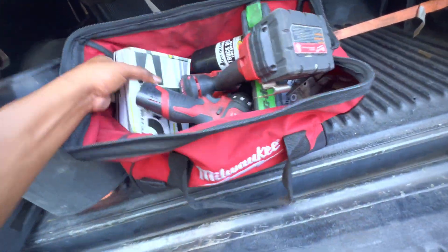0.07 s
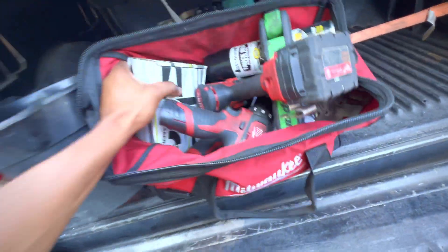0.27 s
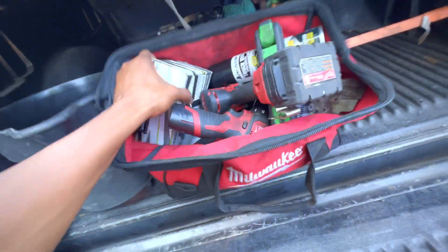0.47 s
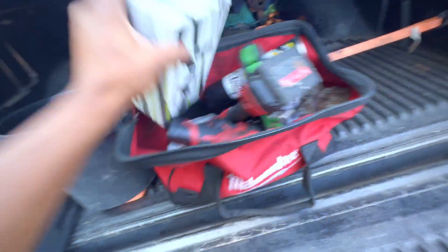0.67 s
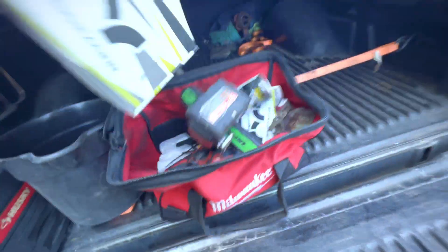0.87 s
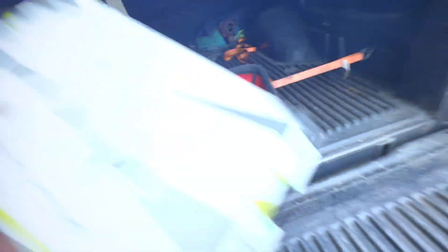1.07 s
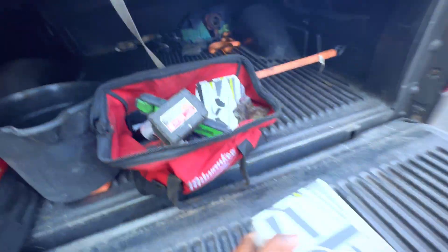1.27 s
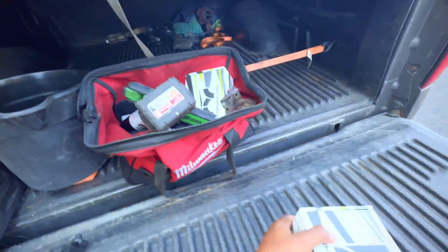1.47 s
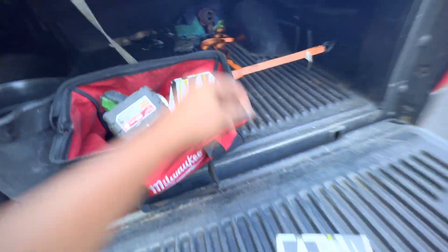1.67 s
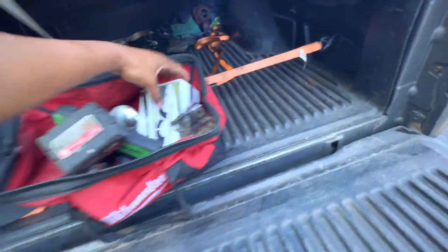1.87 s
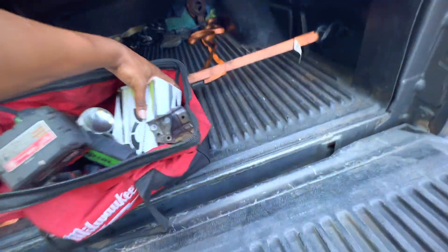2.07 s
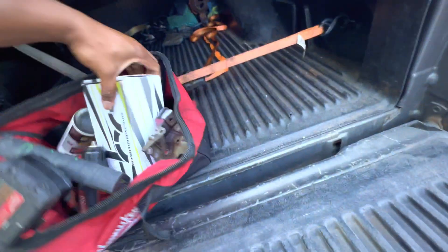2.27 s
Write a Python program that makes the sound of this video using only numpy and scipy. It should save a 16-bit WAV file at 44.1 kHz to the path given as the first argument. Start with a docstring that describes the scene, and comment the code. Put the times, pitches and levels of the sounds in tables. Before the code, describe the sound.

Rummaging in a fabric tool bag, slightly left: from 0 to 1.25 s cloth and cardboard rustle while plastic-cased tools knock, steel bits clink and heavier thumps come around 0.7 s. The carton squeaks briefly at 1.0 s. At 1.37 s it drops loudly on the hollow tailgate, rocks and lands again at 1.55 s. After a lull, soft rustling resumes from 1.9 s, with a cardboard scuff at 2.3 s. Low rumble beneath.

```python
"""The bed of a pickup, heard by a two-port microphone: a hand digs a carton out of a fabric tool bag, a little
to the left. Over a low rumble, grainy noise makes the cloth and cardboard rustle; damped modes and noise bursts
make plastic-cased tools knock and steel parts clink. The carton squeaks free, then drops on the hollow tailgate
ahead with booming noise and ringing modes, rocks and lands again. After a lull the hand digs in the bag once
more, and fingers scuff stiff cardboard: friction noise through panel resonances."""
import sys
import numpy as np
from scipy import signal
from scipy.fft import rfft, irfft
from scipy.io import wavfile

SR = 44100
rng = np.random.default_rng(int(sys.argv[2]) if len(sys.argv) > 2 else 0)


def unload_audio(sound):
    """Save the sound as a 16-bit wav file, at the path given as the first command line argument."""
    columns = np.transpose(np.atleast_2d(sound))
    # keep every value between -1 and 1, then stretch to whole-number steps
    steps = np.round(np.clip(columns, -1, 1) * 32767)
    wavfile.write(sys.argv[1], SR, steps.astype(np.int16))


N = 101826
TIME = np.arange(N) / SR
HIT = SR // 2   # samples in one struck sound
AGE = np.arange(HIT) / SR   # time since the strike [s]
ATTACK_S = 0.0004
TAIL_DB, TAIL_T60_S = -14, 0.17   # reflections that follow a contact


def from_db(db):
    """Decibels to gain."""
    return 10 ** (np.asarray(db) / 20)


def at_hz(points, hz):
    """Read a table on a log-frequency axis."""
    f, v = np.transpose(points)
    return np.interp(np.log(hz + 1e-9), np.log(f), v)


def in_time(rows):
    """The columns of a curve at every sample."""
    s, *columns = np.transpose(rows)
    return [np.interp(TIME, s, c) for c in columns]


def decay(t60):
    """A fall of 60 dB in t60 seconds."""
    return np.exp(-np.log(1000) * AGE / t60)


def attack(attack_s):
    """A strike builds up exponentially, as the contact takes a moment."""
    return 1 - np.exp(-AGE / attack_s)


def swell(s, width_s):
    """A smooth rise and fall around time s."""
    return np.exp(-((TIME - s) / width_s) ** 2 / 2)


def wander(size, over_s):
    """Smooth random motion of spread 1: noise low-passed at 1 / over_s."""
    lowpass = signal.butter(2, 1 / over_s, fs=SR, output="sos")
    x = signal.sosfilt(lowpass, rng.standard_normal(size))
    return x / x.std()


def add(out, s, sound):
    """Mix a struck sound in at time s."""
    i = int(s * SR)
    out[:, i:i + HIT] += sound[..., :N - i]


# likeness of the two microphone ports: (frequency [Hz], left-right correlation [0-1])
PORT_LIKENESS = [(150, 0.93), (450, 0.86), (900, 0.14), (1800, 0.32), (5000, 0.011)]


def noise(spectrum, size, tilt_db=0):
    """Coloured stereo noise of rms 1, alike on both sides in the bass; tilt in dB per octave."""
    hz = np.arange(size // 2 + 1) * SR / size
    mid, side = rfft(rng.standard_normal((2, size)))
    alike = np.clip(at_hz(PORT_LIKENESS, hz), 0, 1)
    colour = from_db(at_hz(spectrum, hz) + tilt_db * np.log2(hz + 1))
    shared = np.sqrt(1 + alike) * mid
    opposed = np.sqrt(1 - alike) * side * [[1], [-1]]
    x = irfft(colour * (shared + opposed), size)
    return x / x.std()


def burst(spectrum, t60, tilt_db=0):
    """Dense, quickly damped modes of one contact and their reflections, as noise scaled to its envelope's spread."""
    fall = np.hypot(decay(t60), from_db(TAIL_DB) * decay(TAIL_T60_S))
    envelope = fall * attack(ATTACK_S)
    x = noise(spectrum, HIT, tilt_db) * envelope
    return x * envelope.std() / x.std()


def ring(hz, t60, attack_s=ATTACK_S):
    """One struck mode: a decaying sine, rms 1 before its attack and decay."""
    return np.sqrt(2) * np.sin(2 * np.pi * hz * AGE) * decay(t60) * attack(attack_s)


def metal(modes):
    """Steel rings unevenly while it chatters against its neighbours, a little differently on each side."""
    sides = np.zeros((2, HIT))
    for side in range(2):
        for hz, db, t60 in modes:
            chatter_db = 2.6 * wander(HIT, over_s=0.008)
            sides[side] += from_db(db + chatter_db) * ring(hz * rng.normal(1, 0.0015), t60)
    return sides


def from_left(x, lead_s):
    """A source nearer the left port reaches the right port a little later."""
    return np.array([x[0], np.interp(TIME - lead_s, TIME, x[1])])


# low rumble around the truck bed: (time [s], level [dB])
RUMBLE_LEVEL = [(0, -39), (.6, -42), (1.0, -41.5), (1.3, -49), (1.5, -36), (1.7, -36.5), (1.83, -50),
                (1.95, -43.5), (2.31, -51)]
# its colour: (frequency [Hz], relative density [dB per Hz])
RUMBLE_COLOUR = [(20, -54), (35, -3), (55, -6.5), (80, -3.5), (120, -3.5), (200, -13), (400, -29),
                 (1500, -71)]


def rumble():
    """Low noise that slowly rises and falls."""
    level_db, = in_time(RUMBLE_LEVEL)
    return from_db(level_db) * noise(RUMBLE_COLOUR, N)


GRAINS_PER_S, GRAIN_S = 1200, 0.005   # rate of slips and decay time of each
GRAIN_SPREAD_DB, GRAIN_SHARE = 2.5, 0.91   # unevenness of the slips, their share of the power


def grain():
    """Fibres catch and slip at random: a spiky gain of rms 1."""
    strength_db = GRAIN_SPREAD_DB * np.minimum(rng.exponential(1, N), 4)
    slips = (rng.random(N) < GRAINS_PER_S / SR) * from_db(strength_db) ** 2
    power = signal.lfilter([1], [1, -np.exp(-1 / (GRAIN_S * SR))], slips + 1e-18)
    return np.sqrt(1 - GRAIN_SHARE + GRAIN_SHARE * power / power.mean())


# cloth and carton rubbing in the bag: (time [s], scrape level [dB], hiss level [dB])
RUBBING = [(0, -37, -39), (.11, -39, -44), (.2, -32.5, -43), (.255, -41, -49.5), (.38, -34.5, -41.5),
           (.44, -32, -34.5), (.52, -26.5, -34), (.58, -30.5, -42), (.665, -36, -44.5), (.72, -32.5, -41),
           (.83, -40.5, -54.5), (.96, -37, -48.5), (1.16, -36, -54.5), (1.23, -55.5, -47), (1.35, -44, -50),
           (1.44, -27, -43.5), (1.53, -33.5, -45), (1.65, -51, -60), (1.8, -49.5, -62), (1.872, -55, -59),
           (1.885, -79, -45.5), (1.92, -65, -42), (2.05, -46, -50.5), (2.16, -38.5, -43),
           (2.24, -39, -42.5), (2.31, -34.5, -45)]
# colour of cardboard along the tools: (frequency [Hz], relative density [dB per Hz])
SCRAPE_COLOUR = [(80, -6), (170, -1), (400, -4), (800, -13.5), (1400, -12), (2400, -21), (4000, -34.5),
                 (10000, -60)]
# colour of stiff cloth: (frequency [Hz], relative density [dB per Hz])
HISS_COLOUR = [(800, 3.5), (2200, 4.5), (4500, 3), (6500, 4), (9000, 2), (11500, -11.5), (16000, -11.5)]


def rustle():
    """Cardboard scrapes along the tools and stiff cloth hisses, both in the same grains."""
    scrape_db, hiss_db = in_time(RUBBING)
    scrape = from_db(scrape_db) * noise(SCRAPE_COLOUR, N)
    hiss = from_db(hiss_db) * noise(HISS_COLOUR, N)
    return grain() * (scrape + hiss)


RATTLES_PER_S, RATTLE_T60_S = 130, 0.05
RATTLE_LOW_HZ, RATTLE_HIGH_HZ = 1000, 4600
RATTLE_DB = -8   # relative to the scrape
RATTLE_REST_DB = -42   # under gentler scraping nothing jostles


def rattle():
    """Odds and ends jostle at random, each with its own short note, as hard as the scraping."""
    out = np.zeros((2, N))
    scrape_db, _ = in_time(RUBBING)
    for when, pitch, strength, side in rng.random((int(RATTLES_PER_S * N / SR), 4)):
        rubbing_db = scrape_db[int(when * N)]
        if rubbing_db < RATTLE_REST_DB:
            continue
        hz = RATTLE_LOW_HZ * (RATTLE_HIGH_HZ / RATTLE_LOW_HZ) ** pitch
        gain = from_db(rubbing_db + RATTLE_DB) * (0.5 + strength)
        pan = np.sqrt([[side], [1 - side]])
        add(out, when * N / SR, gain * pan * ring(hz, RATTLE_T60_S))
    return out


THUD_T60_S, CLACK_T60_S, TICK_T60_S = 0.054, 0.03, 0.025
THUD_SCATTER = 0.95   # noise beside the thud's note
# tools knock in the bag: (time [s], thud level [dB], thud pitch [Hz], clack level [dB], tick level [dB])
KNOCKS = [(0.031, -21, 328, -27.5, -34), (.070, -32.5, 422, -26.5, -33.5), (0.127, -43, 403, -28.5, -44),
          (.140, -33, 384, -23, -27.5), (.155, -26, 480, -15, -21), (.171, -20.5, 304, -40, -49),
          (0.308, -36.5, 420, -28, -35), (0.349, -25.5, 550, -20, -31), (.435, -26.5, 416, -18, -25),
          (0.49, -29, 394, -24.5, -31), (0.502, -43, 475, -20.5, -21), (.683, -22, 318, -23.5, -30),
          (.701, -23, 388, -29, -22), (0.752, -38, 367, -34, -28), (.906, -22.5, 318, -20.5, -27.5),
          (1.049, -23, 350, -25.5, -31), (1.106, -29.5, 375, -26.5, -32), (1.134, -21, 353, -29.5, -36),
          (1.186, -29, 335, -17.5, -31.5), (1.247, -41, 394, -14.5, -29), (1.507, -40, 400, -42, -33),
          (2.139, -31.5, 378, -38, -44), (2.257, -33.5, 360, -36, -44)]
# colour of a thud muffled by the bag: (frequency [Hz], relative density [dB per Hz])
THUD_COLOUR = [(90, -10), (220, 5), (400, 5.5), (700, -1), (1200, -80), (3000, -83)]
# colour of a plastic case's clack: (frequency [Hz], relative density [dB per Hz])
CLACK_COLOUR = [(400, -9.5), (850, -7), (1300, 3), (1900, -6), (2350, -2), (3000, -15), (5000, -28),
                (12000, -74)]
# colour of the bright tick: (frequency [Hz], relative density [dB per Hz])
TICK_COLOUR = [(1500, -12), (3300, -2.5), (5000, 2.5), (6800, -3), (9000, -2.5), (11500, -14), (16000, -18)]


def knocks():
    """Each knock is a tick, the clack of a plastic case and a thud muffled by the bag."""
    out = np.zeros((2, N))
    for s, thud_db, hz, clack_db, tick_db in KNOCKS:
        note = ring(hz, THUD_T60_S, attack_s=0.0019)
        thud = note + THUD_SCATTER * burst(THUD_COLOUR, THUD_T60_S)
        add(out, s, from_db(thud_db) * thud)
        add(out, s, from_db(clack_db) * burst(CLACK_COLOUR, CLACK_T60_S))
        add(out, s, from_db(tick_db) * burst(TICK_COLOUR, TICK_T60_S))
    return out


# a steel bit is struck: (time [s], level [dB], reference pitch [Hz], t60 [s], brightness [dB per octave])
CLINKS = [(.157, -36, 4695, .17, -1), (.489, -25, 4760, .08, -3), (.502, -26, 4870, .08, -5),
          (1.119, -38, 4740, .09, 8)]
# its bending modes: (multiple of the reference pitch, relative level [dB])
BIT_MODES = [(0.514, -18), (0.997, 2), (1.615, -1.5)]


def clinks():
    """Struck steel bits ring in bending modes, the higher ones dying sooner."""
    out = np.zeros((2, N))
    for s, db, hz, t60, tilt_db in CLINKS:
        modes = [(hz * k, db + mode_db + tilt_db * np.log2(k), t60 / np.sqrt(k)) for k, mode_db in BIT_MODES]
        add(out, s, metal(modes))
    return out


# heavy low thumps, as the bag shifts and the carton lands: (time [s], level [dB], pitch [Hz])
THUMPS = [(.172, -25.5, 104), (0.551, -28.5, 124), (.69, -22.5, 159), (0.715, -17.5, 111),
          (0.792, -23, 109), (1.392, -22.5, 151), (1.549, -20, 138), (1.574, -22, 84), (1.611, -20, 59.6)]


def thumps():
    """Heavy shifts and landings thump: one low damped mode each."""
    out = np.zeros((2, N))
    for s, db, hz in THUMPS:
        add(out, s, from_db(db) * ring(hz, t60=0.092, attack_s=0.0021))
    return out


# loose screws and washers ping: (time [s], level [dB], pitch [Hz], t60 [s])
PINGS = [(.583, -39, 8160, 0.25), (0.592, -37.5, 12330, 0.14), (.622, -42.5, 4270, 0.069),
         (0.667, -42.5, 3190, .09), (0.699, -31, 4200, .076), (0.702, -26, 11280, 0.024),
         (1.25, -30.5, 4790, 0.059), (1.393, -16, 5590, 0.024)]


def pings():
    """Small steel parts ring with a single mode."""
    out = np.zeros((2, N))
    for s, db, hz, t60 in PINGS:
        add(out, s, metal([(hz, db, t60)]))
    return out


SLIP_SAG_HZ_PER_S, SLIP_WOBBLE_HZ = 4000, 35
# the carton squeaks as it slides free: (time of the peak [s], width [s], pitch at the peak [Hz], level [dB])
SQUEAKS = [(.981, .007, 1240, -33), (1.006, .012, 1090, -38), (1.024, .004, 1160, -33)]


def squeaks():
    """Short stick-slip tones, each sagging and wobbling in pitch, the same on both sides."""
    out = np.zeros(N)
    for s, width_s, pitch_hz, db in SQUEAKS:
        wobble_hz = SLIP_WOBBLE_HZ * wander(N, over_s=0.0024)
        hz = pitch_hz - SLIP_SAG_HZ_PER_S * (TIME - s) + wobble_hz
        tone = np.sqrt(2) * np.sin(2 * np.pi * np.cumsum(hz) / SR)
        out += from_db(db) * swell(s, width_s) * tone
    return out


# a larger steel tool is struck: (time [s], level [dB])
CLANGS = [(1.187, -44), (1.249, -32)]
# its modes: (frequency [Hz], relative level [dB], t60 [s])
TOOL_MODES = [(1250, -3, .06), (1720, -5, .06), (2126, 2, .42), (2150, -6, .35), (2374, -4, .12),
              (3290, -14, .2)]


def clangs():
    """A larger steel tool rings lower than the bits."""
    out = np.zeros((2, N))
    for s, db in CLANGS:
        add(out, s, from_db(db) * metal(TOOL_MODES))
    return out


BOOM_T60_S = 0.23
# the carton meets the tailgate: (time [s], boom level [dB], boom brightness [dB per octave],
# clack level [dB], level of its rattling contents [dB])
DROPS = [(1.3744, -7, -3.5, -27, -24.5), (1.396, -15.5, -2.5, -31, -11.5), (1.41, -20, -12.5, -21, -39),
         (1.425, -16.5, -4.5, -21, -52), (1.543, -14, -5.5, -16.5, -29.5), (1.573, -20, -8, -32, -30.5)]
# colour of the boom: (frequency [Hz], relative density [dB per Hz])
BOOM_COLOUR = [(50, -46), (150, -16.5), (290, -12.5), (420, -1.5), (650, -7), (1020, -11.5), (1700, -20.5),
               (4000, -33.5)]


def carton_drops():
    """Every contact booms, clacks and shakes the parts inside the carton."""
    out = np.zeros((2, N))
    for s, boom_db, tilt_db, clack_db, rattle_db in DROPS:
        add(out, s, from_db(boom_db) * burst(BOOM_COLOUR, BOOM_T60_S, tilt_db))
        add(out, s, from_db(clack_db) * burst(CLACK_COLOUR, CLACK_T60_S))
        add(out, s, from_db(rattle_db) * burst(TICK_COLOUR, TICK_T60_S))
    return out


# landings that set the tailgate ringing: (time [s], level [dB], brightness [dB per octave])
LANDINGS = [(1.3748, -18.5, 3), (1.426, -36, 1), (1.544, -21.5, -7.5)]
# modes of the hollow tailgate: (frequency [Hz], relative level [dB], t60 [s])
TAILGATE_MODES = [(291, -6, .2), (350, -1, .17), (415, -2, .15), (467, -4, .15), (556, -5, .18),
                  (605, -9, .2), (692, -8, .19), (778, -8, .16), (867, -13, .15), (935, -7, .13),
                  (1025, -9, .15)]


def tailgate():
    """The hollow tailgate rings in many modes, neighbours starting in opposite directions."""
    out = np.zeros((2, N))
    for s, db, tilt_db in LANDINGS:
        for k, (hz, mode_db, t60) in enumerate(TAILGATE_MODES):
            gain = from_db(db + mode_db + tilt_db * np.log2(hz / 420))
            add(out, s, (-1) ** k * gain * ring(hz, t60))
    return out


# the hollow carton answers with a note of its own: (time [s], level [dB], pitch [Hz])
CARTON_NOTES = [(1.376, -19, 343), (1.435, -13.5, 391.5), (1.544, -8, 389)]


def carton_notes():
    """The hollow carton resonates with one damped mode at each landing."""
    out = np.zeros((2, N))
    for s, db, hz in CARTON_NOTES:
        add(out, s, from_db(db) * ring(hz, t60=0.1, attack_s=0.0044))
    return out


PANEL_WIDTH_HZ = 43   # bandwidth of each resonance
# fingers scuff the stiff cardboard: (time of the peak [s], width [s], level of one layer [dB])
SCUFFS = [(1.92, 0.013, -49), (2.289, 0.012, -35.5)]
# resonances of the cardboard panel: (frequency [Hz], relative level [dB])
PANEL_MODES = [(650, -3), (1320, 1), (2100, -1), (2560, -10)]


def scuffs():
    """Grainy friction drives the resonances of a cardboard panel; one layer."""
    friction = grain() * rng.standard_normal((2, N))
    panel = np.zeros((2, N))
    for hz, db in PANEL_MODES:
        b, a = signal.iirpeak(hz, hz / PANEL_WIDTH_HZ, fs=SR)
        panel += from_db(db) * signal.lfilter(b, a, friction)
    strokes = sum(from_db(db) * swell(s, width_s) for s, width_s, db in SCUFFS)
    return panel / panel.std() * strokes


BAG_LEAD_S = 0.0002778   # the path to the left port is about 10 cm shorter
TAILGATE_LEAD_S = 0.00006   # about 2 cm shorter: nearly straight ahead


def scene():
    """The bag and the thumps a little to the left, the tailgate ahead, a low rumble under both."""
    steel = clinks() + pings() + clangs()
    friction = rustle() + squeaks() + scuffs() + scuffs()   # two independent layers of scuffing
    bag = knocks() + thumps() + rattle() + steel + friction
    landing = carton_drops() + tailgate() + carton_notes()
    return rumble() + from_left(bag, BAG_LEAD_S) + from_left(landing, TAILGATE_LEAD_S)


# treble colour of the microphone: (frequency [Hz], gain [dB])
MIC_COLOUR = [(10000, 0), (12400, 5), (13900, -12), (15400, 10), (17000, -14)]
# difference between its two ports: (frequency [Hz], left minus right [dB])
PORT_BALANCE = [(500, 0.5), (2500, -.5), (5000, 5.5), (7000, 5), (9000, -5.5), (12000, -3)]


def record(dry):
    """The two microphone ports colour the sound differently; peaks are rounded, deep bass and top are cut."""
    hz = np.arange(N // 2 + 1) * SR / N
    port_db = at_hz(MIC_COLOUR, hz) + at_hz(PORT_BALANCE, hz) * [[0.5], [-0.5]]
    x = irfft(rfft(dry) * from_db(port_db), N)
    x = signal.sosfilt(signal.butter(6, 45, "high", fs=SR, output="sos"), x)
    rounded = 1.2 * np.tanh(x / 1.2)
    top_cut = signal.cheby2(12, 70, 17600, fs=SR, output="sos")   # 70 dB down from 17600 Hz up
    return signal.sosfilt(top_cut, rounded)


dry = scene()
out = record(dry)
unload_audio(out)
```